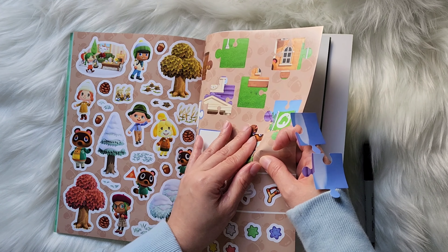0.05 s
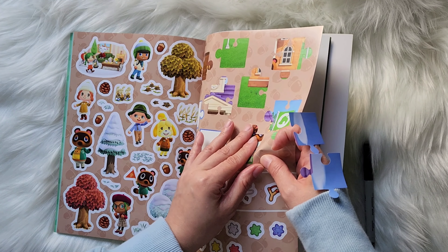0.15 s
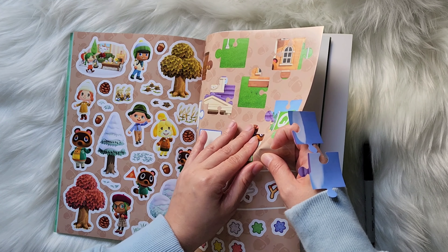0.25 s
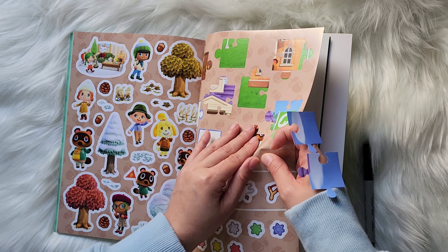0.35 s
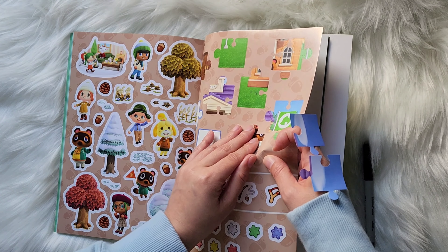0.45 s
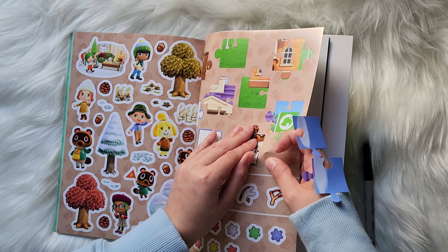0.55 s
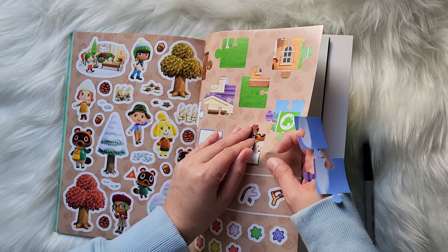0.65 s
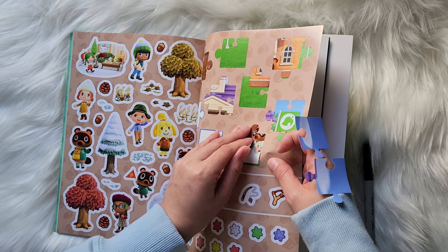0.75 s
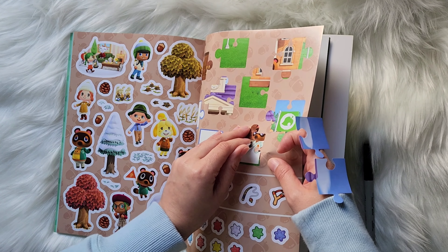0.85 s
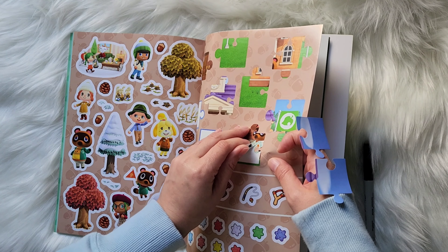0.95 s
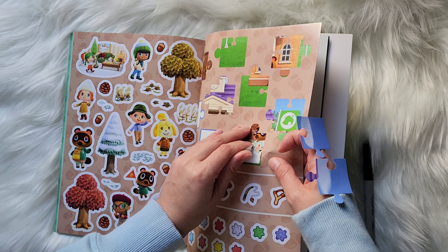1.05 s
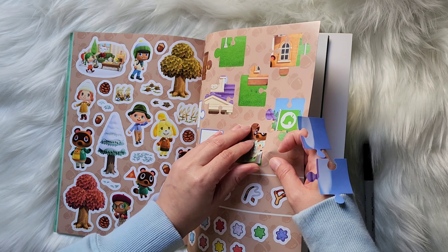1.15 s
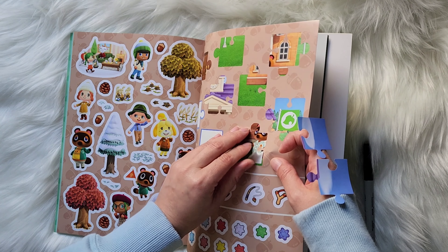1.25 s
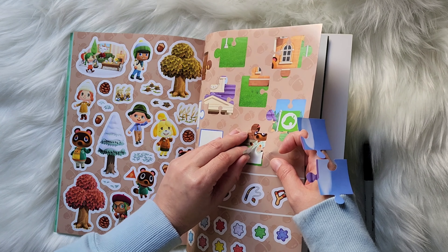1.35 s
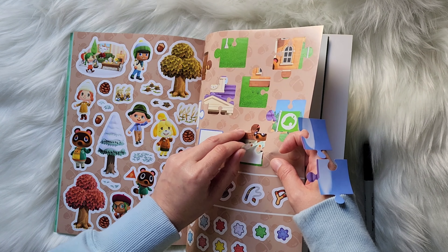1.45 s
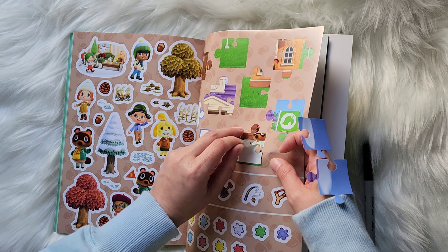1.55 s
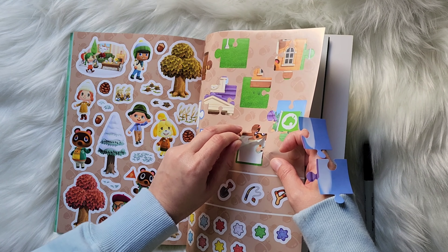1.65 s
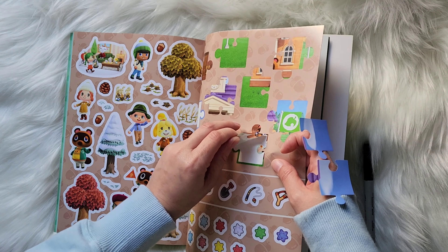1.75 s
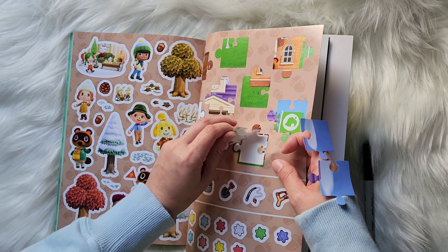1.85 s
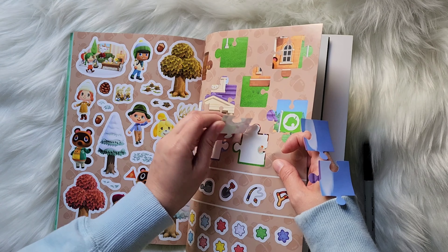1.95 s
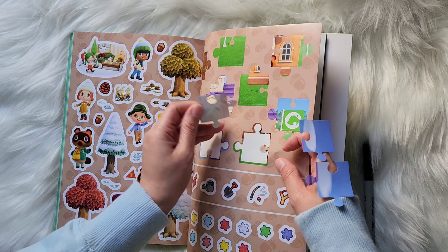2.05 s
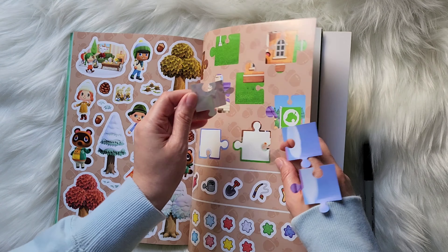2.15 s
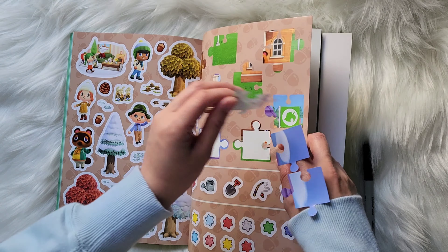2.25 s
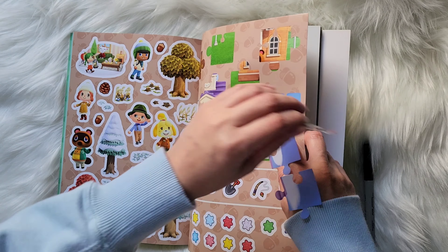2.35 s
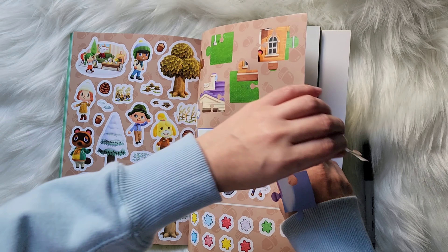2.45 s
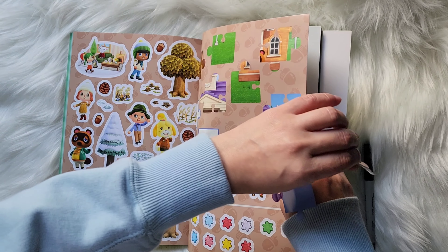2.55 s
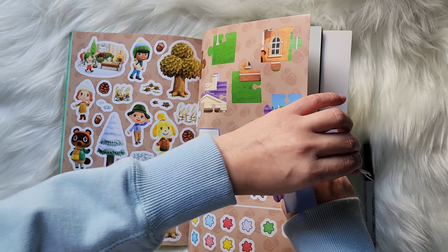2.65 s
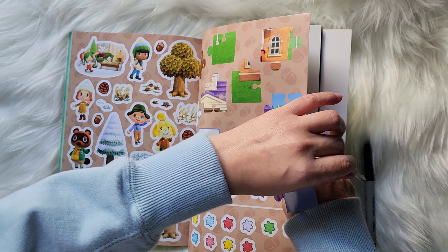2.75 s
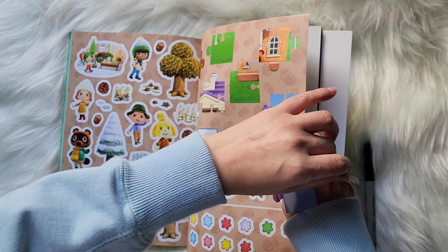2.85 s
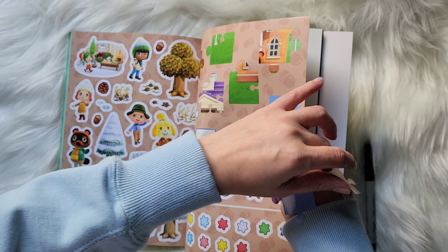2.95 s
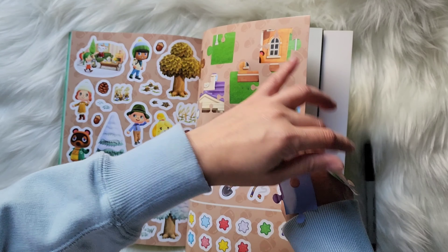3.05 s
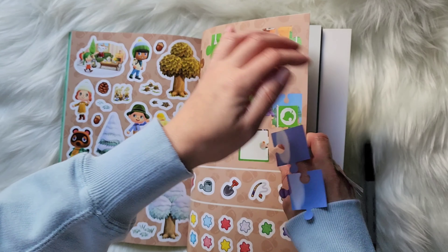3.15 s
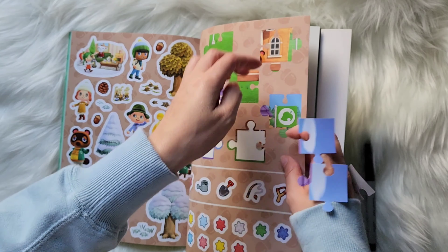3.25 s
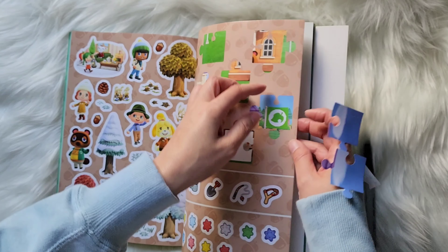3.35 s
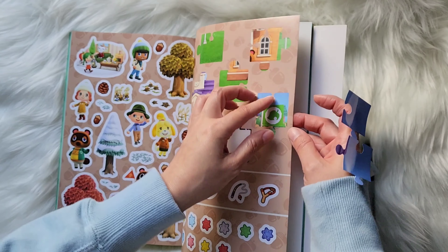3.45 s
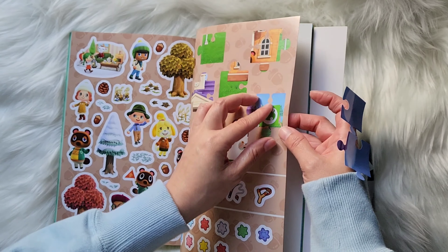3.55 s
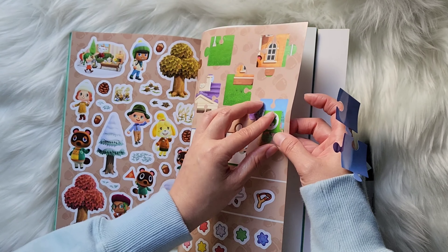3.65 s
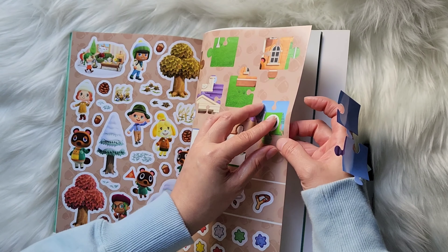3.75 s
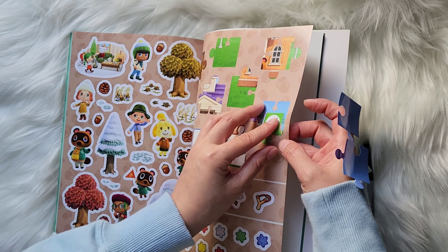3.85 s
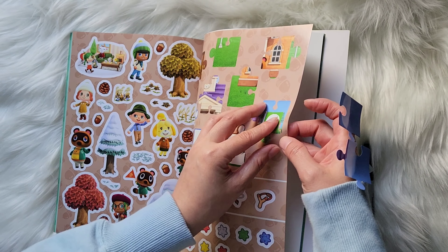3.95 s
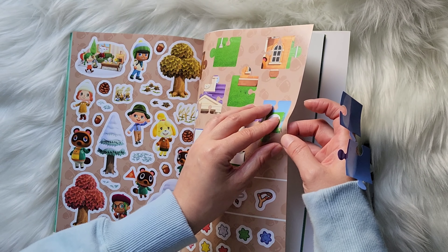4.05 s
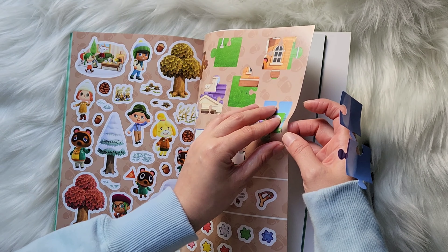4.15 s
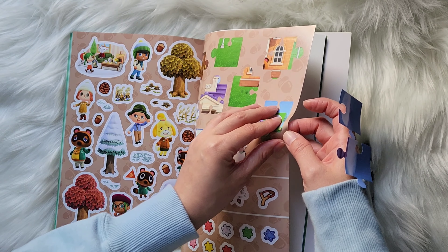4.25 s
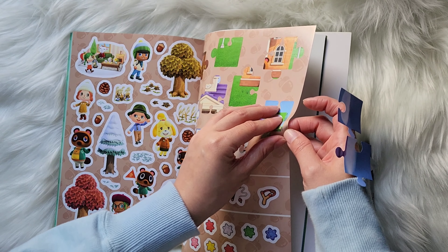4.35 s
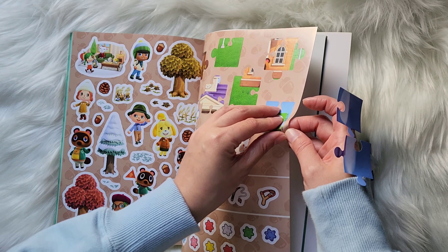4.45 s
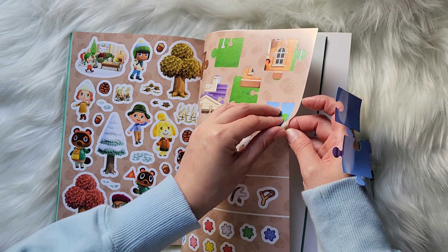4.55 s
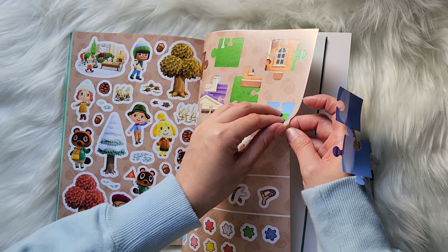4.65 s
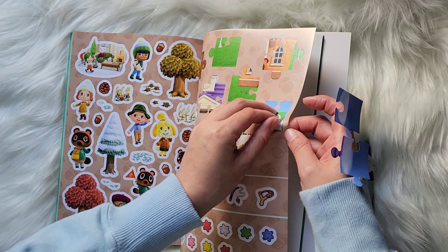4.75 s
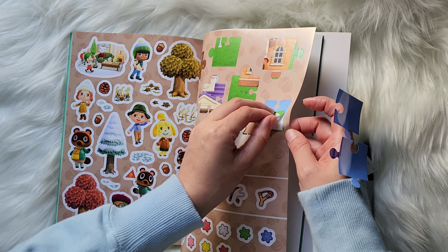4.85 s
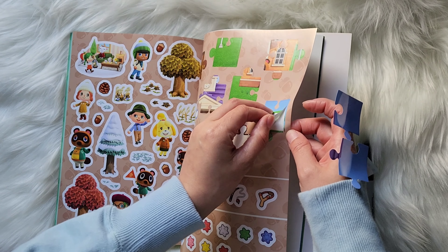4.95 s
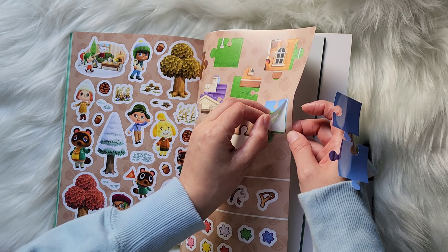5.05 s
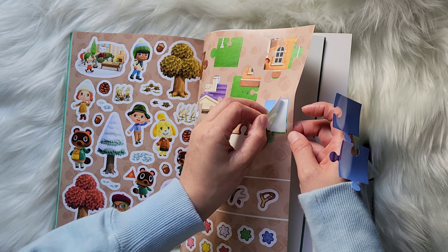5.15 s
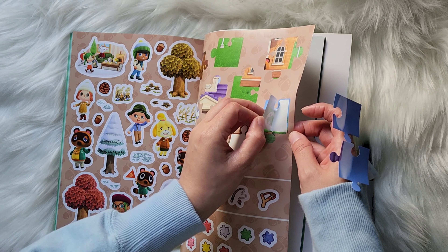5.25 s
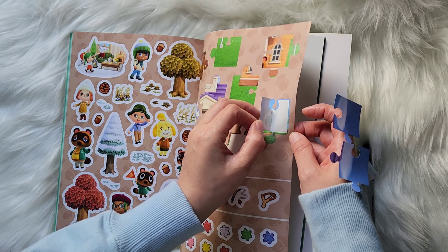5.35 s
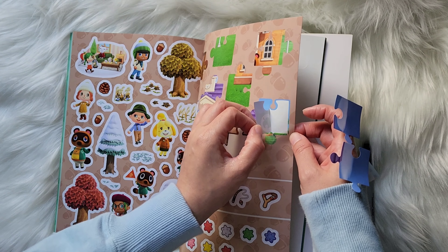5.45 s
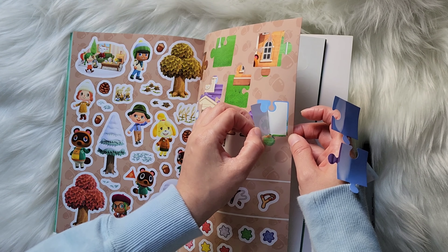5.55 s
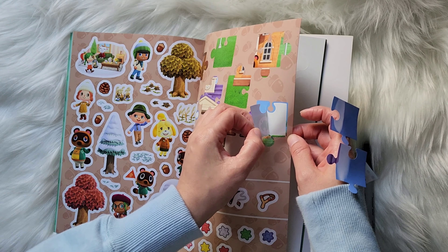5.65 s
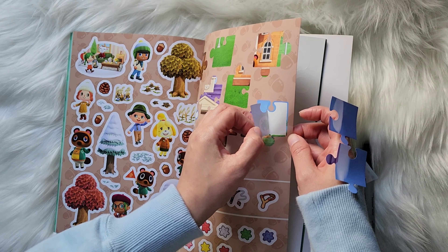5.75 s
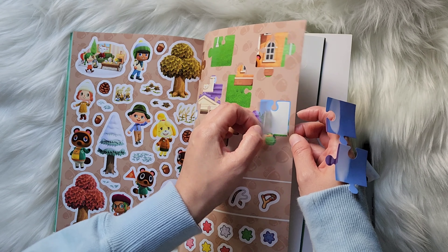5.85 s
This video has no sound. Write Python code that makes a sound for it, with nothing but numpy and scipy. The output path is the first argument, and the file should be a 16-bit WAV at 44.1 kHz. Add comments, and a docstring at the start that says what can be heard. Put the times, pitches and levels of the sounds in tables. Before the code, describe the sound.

Stickers are picked and peeled from a stiff paper page, with nail ticks, sharp snaps, soft rasping slides and fine crackle in a quiet room.

```python
"""Sharp snaps, nail ticks, papery slides and a fine crackle, close to a stereo microphone in a quiet room.
Stickers are picked loose and peeled off the stiff page of a sticker book, which snaps back as corners come free.
Each tick is a jolt with a burst of fibre slips; slides, peeling and bending are trains of tiny slips.
All of them pass through the resonances of the page and a small room; a low room tone lies underneath."""
import sys
import numpy as np
from scipy import signal
from scipy.fft import rfft, irfft
from scipy.io import wavfile
from scipy.ndimage import uniform_filter1d

SR = 44100
rng = np.random.default_rng(int(sys.argv[2]) if len(sys.argv) > 2 else 0)


def master_out(mix):
    """Clip the mix to full scale and print it as 16-bit PCM to the path in sys.argv[1]."""
    frames = np.transpose(np.atleast_2d(mix))
    ceiling = np.clip(frames, -1, 1)
    pcm = np.round(ceiling * 32767).astype(np.int16)
    wavfile.write(sys.argv[1], SR, pcm)


N = 260190
TIME = np.arange(N) / SR
TRACK_HZ = np.fft.rfftfreq(N, 1 / SR)
SIZE, LEAD = 4096, 128  # samples: length of a tick, and the part of it kept ahead of its onset
HZ = np.fft.rfftfreq(SIZE, 1 / SR)

# likeness of paper sounds between left and right: f/Hz, likeness/0-1
PAPER_LIKENESS = [(400, 0.85), (1400, 0.86), (2500, 0.3), (5000, 0.03), (12000, .25)]


def page_snaps():
    """The page buckles and snaps back, each time with its own colour."""
    # part levels are rms over 10 ms, before the dead spot; the ring width is that of one hump before squaring:
    # t/s, thud level/dB, thud f/Hz, ring level/dB, ring f/Hz, ring width/Hz,
    # crack level/dB, crack f/Hz, fizz level/dB, dead spot f/Hz
    snaps = [(1.117, -50.5, 200, -51, 1400, 800, -59, 2400, -62.5, 293),
             (1.6764, -39.5, 467, -31.5, 1415, 348, -46, 4400, -51, 690),
             (1.7398, -46, 600, -44.5, 1560, 850, -42.5, 4900, -47.5, 2950),
             (1.9085, -38.5, 620, -33.5, 1620, 1250, -28.5, 3000, -33, 210),
             (1.9136, -54, 579, -51, 1574, 1400, -40.5, 2604, -48, 210),
             (2.0382, -34.5, 480, -28, 1484, 650, -27, 3100, -35, 760),
             (2.227, -38, 430, -26, 1390, 520, -28, 2680, -50.5, 726),
             (3.3611, -56.5, 480, -40.5, 1440, 440, -40.5, 2120, -80, 251),
             (5.2785, -48.5, 524, -47.5, 880, 520, -52.5, 2735, -62, 740),
             (5.2831, -51, 524, -55, 850, 800, -61, 2400, -74, 740),
             (5.5826, -47.5, 396, -38.5, 1550, 895, -46.5, 2100, -70, 380),
             (5.757, -42, 403, -33.5, 1380, 950, -43, 2340, -92, 870)]
    return place([(s, tick(*colour, burst_s=.0024, travel_s=.0007)) for s, *colour in snaps])


def nail_ticks(fizz_below_crack_db=-18):
    """A nail catches the edge of a sticker: ticks of one pitch set, in varied strength."""
    # part levels as in the snaps: t/s, ring level/dB, thud level/dB, crack level/dB
    nails = [(0.0306, -44, -56, -47), (0.046, -57, -69, -64), (0.0535, -57, -67, -68),
             (0.064, -55, -70, -69), (0.077, -57, -70, -67), (0.088, -43.5, -68, -46.5),
             (0.1383, -67, -68.5, -57.5), (0.1868, -53, -56.5, -51.5), (0.2121, -46.5, -68, -49),
             (0.2394, -44, -54, -46.5), (0.269, -46.5, -58.5, -50), (0.3206, -59.5, -80, -57.5),
             (0.378, -52, -71, -52.5), (0.3894, -51, -67, -55), (0.402, -54, -71, -51.5),
             (0.4113, -53, -66, -55), (0.4202, -51, -69, -51), (0.5728, -50.5, -80, -51.5),
             (1.2285, -51.5, -58, -59), (2.324, -57.5, -60, -54), (2.634, -70.5, -80.5, -71.5),
             (3.411, -44.5, -61, -56), (3.4244, -52, -60.5, -54.5), (3.9757, -55.5, -62, -80),
             (4.256, -58.5, -65, -75), (4.2952, -57.5, -79, -72), (4.323, -58, -77, -75),
             (4.3511, -52.5, -80, -64.5), (4.3888, -47.5, -67.5, -54.5), (4.5362, -47.5, -78, -51),
             (4.6549, -51.5, -82, -55), (5.0568, -53.5, -57, -56), (5.1571, -52.5, -63, -61),
             (5.3927, -54.5, -59, -59.5), (5.891, -54.5, -55, -59.5)]
    sounds = []
    for s, ring_db, thud_db, crack_db in nails:
        sound = tick(thud_db, 384, ring_db, 1240, 960, crack_db, 2410, crack_db + fizz_below_crack_db, dead_hz=520)
        sounds.append((s, sound))
    return place(sounds)


def glue_pops(thud_below_ring_db=-9):
    """A spot of glue gives way at once, with a bright pop that tugs the page."""
    # part levels as in the snaps: t/s, fizz level/dB, crack level/dB, ring level/dB
    pops = [(0.9593, -57, -63, -65), (0.9977, -59, -65, -79), (1.4477, -66, -64, -61.5),
            (1.5267, -66, -60, -64), (1.5416, -65, -64, -62), (1.7786, -47, -45, -50),
            (1.8, -55, -57, -52.5), (1.8798, -60, -54.5, -53), (1.9877, -45, -46, -52.5),
            (2.964, -74, -56.5, -63.5), (4.7682, -55.5, -56.5, -61.5), (4.8057, -60, -59, -61),
            (5.0716, -56, -53.5, -51), (5.2292, -56, -58.5, -65), (5.2535, -54.5, -55.5, -71),
            (5.346, -62, -60.5, -62)]
    sounds = []
    for s, fizz_db, crack_db, ring_db in pops:
        thud_db = ring_db + thud_below_ring_db
        sound = tick(thud_db, 450, ring_db, 1520, 630, crack_db, 4700, fizz_db, dead_hz=780, burst_s=.0021)
        sounds.append((s, sound))
    return place(sounds)


def sliding(rasp_trim_db=-1, hiss_trim_db=-2, broad_db=-7, resting_rasp_db=-77, resting_hiss_db=-79):
    """Fingers and sleeve rasp and hiss on the page; the pitch of the rasp moves with the grip."""
    # strokes over the page, levels before trim: peak t/s, rise/s, fall/s, rasp level/dB, hiss level/dB, rasp f/Hz
    strokes = [(0.02, 0.14, 0.2, -59.5, -65.5, 1470), (0.41, .08, 0.24, -55.5, -60, 1656),
               (0.55, 0.077, .05, -67, -62, 1650), (0.88, 0.034, .03, -67, -68.5, 1623),
               (0.97, 0.084, 0.1, -66.5, -73, 1500), (1.18, .018, .02, -64, -74, 1500),
               (1.27, .04, 0.053, -63, -75, 1700), (1.319, 0.025, 0.016, -52.5, -51.5, 1453),
               (1.52, 0.082, 0.06, -69.5, -64.5, 1500), (1.68, 0.019, .2, -65.5, -61, 1500),
               (1.82, .08, 0.13, -62, -66, 1570), (1.97, 0.054, .018, -57.5, -54.5, 1480),
               (2.18, 0.13, .11, -57.5, -69, 1750), (2.315, .06, .025, -57, -65.5, 1560),
               (2.44, .02, .04, -68.5, -67, 1600), (2.94, 0.072, 0.084, -63.5, -69.5, 1800),
               (3.145, 0.035, 0.08, -62, -68, 1900), (3.26, .08, 0.097, -56.5, -63, 2000),
               (3.47, 0.1, 0.047, -57.5, -63, 1296), (3.61, 0.09, 0.14, -55, -61.5, 1250),
               (3.84, 0.088, 0.043, -55.5, -58.5, 1550), (4.03, 0.14, 0.15, -59, -71.5, 1420),
               (4.25, .05, 0.028, -61, -79, 1400), (4.43, .13, 0.086, -60.5, -71, 1400),
               (4.55, .015, 0.057, -55.5, -65, 1420), (4.77, 0.12, 0.058, -57, -58, 1450),
               (4.95, .07, 0.1, -66.5, -69, 1445), (5.105, 0.049, 0.072, -56, -54, 1610),
               (5.28, 0.053, 0.061, -63.5, -62.5, 1590), (5.41, 0.035, 0.044, -59.5, -72, 1480),
               (5.47, .03, 0.016, -65, -63.5, 1486), (5.64, 0.044, .09, -62, -81, 1520),
               (5.89, .07, .1, -65, -83, 1650)]
    # colour of the rasp: f/Hz, level/dB
    rasp_colour = [(200, -32.5), (600, -17.5), (850, -9.5), (1150, -1.5), (1600, -1.5), (2200, -1),
                   (2700, -6.5), (3100, -11.5), (4500, -25.5), (16000, -54.5)]
    # colour of the hiss: f/Hz, level/dB
    hiss_colour = [(1000, -32.5), (2300, -7), (3200, -0.5), (5000, -3), (8200, -3), (9200, -19),
                   (16000, -35)]
    *timing, rasps_db, hisses_db, hz = np.transpose(strokes)
    rasping = swells(*timing, rasps_db)
    hissing = swells(*timing, hisses_db)

    rasp = friction(rasp_colour, slips_per_s=320, spread_db=1.5, smooth_db=-1, clump_db=2, clump_hz=53)
    pitched = resonate(rasp, grip(rasping, hz), width_hz=410)
    rasp = unit(pitched + amp(broad_db) * rasp)
    hiss = friction(hiss_colour, slips_per_s=1500, spread_db=4.5, smooth_db=-4, clump_db=2, clump_hz=69)
    hiss = patchy(hiss, depth_db=2)

    # the hands never lie quite still, so each gain rests on a floor
    rasp_gain = amp(rasp_trim_db) * np.hypot(level(rasping), amp(resting_rasp_db))
    hiss_gain = amp(hiss_trim_db) * np.hypot(level(hissing), amp(resting_hiss_db))
    return rasp * rasp_gain + hiss * hiss_gain


def peeling(trim_db=-2, resting_db=-91.5):
    """Threads of glue break one after another along the edge of the sticker."""
    # stretches pulled off the page, levels before trim: peak t/s, rise/s, fall/s, crackle level/dB
    pulls = [(0.02, .1, .3, -79), (0.42, .12, .1, -85), (0.545, 0.057, 0.043, -55.5),
             (0.7, 0.11, 0.067, -68), (0.95, 0.099, .07, -75.5), (1.319, 0.018, 0.013, -48.5),
             (1.49, .05, 0.074, -74), (1.76, 0.067, .08, -59), (1.92, .02, .11, -56.5),
             (2.22, 0.034, .06, -66.5), (2.49, 0.078, 0.084, -82), (2.96, 0.017, .04, -78),
             (3.43, 0.15, 0.1, -76), (3.64, .05, .12, -77), (3.84, .07, .04, -69),
             (4.755, .042, 0.052, -56.5), (4.97, 0.11, .08, -66.5), (5.11, 0.074, 0.063, -51),
             (5.255, 0.028, 0.1, -64)]
    # colour of the breaking glue: f/Hz, level/dB
    glue_colour = [(1000, -32.5), (3000, -4.5), (5000, -4.5), (8000, 0), (11000, 0), (14000, 1.5),
                   (16000, -8)]
    crackle = friction(glue_colour, slips_per_s=1100, spread_db=5.5, smooth_db=-12, clump_db=4, clump_hz=170)
    pull = level(swells(*np.transpose(pulls)))
    return amp(trim_db) * patchy(crackle, depth_db=2.5) * np.hypot(pull, amp(resting_db))


def bending(trim_db=-1, resting_db=-78.5):
    """The page murmurs low as it is dragged and bent under the hand."""
    # bends of the page, levels before trim: peak t/s, rise/s, fall/s, level/dB, f/Hz
    bends = [(0.14, .3, 0.33, -62.5, 338), (0.6, .3, 0.37, -75, 420), (1.04, .04, .02, -70.5, 444),
             (1.13, .02, 0.089, -68.5, 445), (1.319, 0.017, 0.012, -54.5, 450),
             (1.48, 0.035, 0.018, -69, 435), (1.76, .08, .05, -63, 480), (2.048, .006, 0.014, -43, 439),
             (2.21, .11, .095, -57, 440), (3.25, 0.059, 0.095, -63.5, 570), (3.44, .06, .07, -69, 424),
             (3.8, .15, 0.21, -62.5, 335), (4.05, 0.19, .3, -63, 307), (4.83, 0.23, .3, -66.5, 365),
             (5.09, .035, .05, -59.5, 440), (5.285, .012, .02, -59.5, 480), (5.4, .03, .06, -68, 390),
             (5.6, .03, .06, -73, 350), (5.78, .03, 0.037, -66, 340), (5.89, 0.014, .06, -60.5, 500)]
    # colour of the murmur: f/Hz, level/dB
    bend_colour = [(80, -18), (200, -5.5), (310, 3.5), (420, -6.5), (600, -2.5), (800, -10), (1500, -33),
                   (5000, -61)]
    *timing, db, hz = np.transpose(bends)
    effort = swells(*timing, db)
    murmur = friction(bend_colour, slips_per_s=400, spread_db=4, smooth_db=-0.5, clump_db=1, clump_hz=22)
    murmur = resonate(murmur, grip(effort, hz), width_hz=130)
    return amp(trim_db) * murmur * np.hypot(level(effort), amp(resting_db))


def tick(thud_db, thud_hz, ring_db, ring_hz, ring_width_hz, crack_db, crack_hz, fizz_db, dead_hz,
         dead_db=-8, dead_width=0.13, thud_width_hz=330, crack_width=1.37, rise_s=0.00044, burst_s=0.0034,
         rough_hz=2600, flutter_s=0.0082, flutter_db=-19, travel_s=0.000608):
    """A jolt of the page with a brief burst of fibre slips that roughens its treble."""
    # colour of the thud: f/Hz, level/dB
    thud_colour = [(50, -13), (160, 0.5), (250, 0), (400, 5.5), (600, 1.5), (900, -6.5), (1600, -34),
                   (4000, -62)]
    # colour of the ring: f/Hz, level/dB
    ring_colour = [(200, -30.5), (650, -11), (1000, -4), (1500, 3), (2000, 3.5), (3000, -1), (8000, -29.5)]
    # colour of the crack: f/Hz, level/dB
    crack_colour = [(600, -38), (1500, -10), (2200, 2.5), (2800, -1.5), (4500, 0), (8000, 3.5),
                    (10000, -21.5), (16000, -38.5)]
    # colour of the fizz: f/Hz, level/dB
    fizz_colour = [(1000, -43.5), (3500, -10.5), (6000, 4.5), (9000, -0.5), (12000, -1.5), (16000, -7.5)]
    t = (np.arange(SIZE) - LEAD) / SR
    decay = np.exp(-np.maximum(t, 0) / burst_s)
    flutter = amp(flutter_db) * np.exp(-abs(t) / flutter_s)
    burst = np.exp(np.minimum(t, 0) / rise_s) * (decay + flutter)
    slips = rng.standard_normal((3, SIZE)) * burst
    slips = rfft(slips / np.linalg.norm(slips, axis=1, keepdims=True))
    slips = pair(slips[0], slips[1:], read(PAPER_LIKENESS, HZ))

    jolt = np.exp(-2j * np.pi * HZ * LEAD / SR)
    rough = HZ ** 4 / (HZ ** 4 + rough_hz ** 4)
    drive = pair(jolt, slips, 1 - rough)
    # bending waves cross the sheet faster at high pitch; travel_s is the delay at 1 kHz
    travel = np.exp(-4j * np.pi * travel_s * np.sqrt(1000 * HZ))

    # the place of the blow picks which resonances speak, and leaves one pitch dead
    parts = [(thud_db, paper(thud_colour) * hump(thud_hz, thud_width_hz)),
             (ring_db, paper(ring_colour) * hump(ring_hz, ring_width_hz) ** 2),
             (crack_db, paper(crack_colour) * hump(crack_hz, crack_width * crack_hz) ** 2),
             (fizz_db, paper(fizz_colour))]
    power = sum((amp(db) * unit(part)) ** 2 for db, part in parts)
    power *= amp(dead_db * hump(dead_hz, dead_width * dead_hz) ** 2) ** 2

    fade = np.minimum(1, np.linspace(2, 0, SIZE)) ** 4
    sound = irfft(drive * travel * causal(np.sqrt(power))) * fade
    # levels count as rms over 10 ms
    return unit(sound) * np.sqrt(power.mean() * .01 * SR / SIZE)


def place(sounds):
    """Lays stereo ticks on the track, each onset at its time in seconds."""
    mix = np.zeros((2, N + LEAD))
    for s, sound in sounds:
        part = mix[:, round(s * SR):][:, :sound.shape[1]]
        part += sound[:, :part.shape[1]]
    return mix[:, LEAD:]


def friction(colour, slips_per_s, spread_db, smooth_db, clump_db, clump_hz):
    """Tiny slips of uneven size over a smooth rush, gathered in clumps; all pass through the page."""
    size = amp(spread_db * np.minimum(rng.exponential(1, (3, N)), 4))
    sign = rng.choice([-1, 1], (3, N))
    slips = size * sign * (rng.random((3, N)) < slips_per_s / SR)
    rush = amp(smooth_db) * rng.standard_normal((3, N))
    z = rfft((unit(slips) + rush) * amp(clump_db * wander(clump_hz)))
    both = irfft(pair(z[0], z[1:], read(PAPER_LIKENESS, TRACK_HZ)), N)
    response = irfft(causal(paper(colour)))
    return unit(signal.oaconvolve(both, response[None], axes=1)[:, :N])


def paper(colour):
    """Gain of a contact of this colour, heard through the resonances of the page."""
    # resonances of the page and book: f/Hz, width/Hz, level/dB
    modes = [(187.4, 32, 7), (243, 45, 2.5), (372.2, 54, 5), (460, 32, 3), (588.8, 60, 7), (790, 340, 2.5),
             (1112, 78, 5), (1390, 240, 3), (1890, 55, 3.5), (2073, 150, 5), (2225, 110, 4), (2432, 130, 7),
             (2690, 160, 4), (2950, 180, 3), (3502, 67, -1), (3950, 250, 2.5), (4386, 580, 4.5),
             (5300, 900, -2), (6350, 480, 1), (6940, 240, -5), (7340, 87, 1), (7630, 160, 4)]
    peaks_db = sum(db / (1 + (2 * (HZ - hz) / width) ** 2) for hz, width, db in modes)
    return amp(read(colour, HZ) + peaks_db)


def hump(hz, width_hz):
    """Gain of one resonance; squared, its skirts are steeper and its start softer."""
    return 1 / np.hypot(1, 2 * (HZ - hz) / width_hz)


def causal(gain):
    """Spectrum of the response with this gain's shape that starts at once and then dies away."""
    log_gain = np.log(np.maximum(gain / gain.max(), 1e-5))
    circle = np.concatenate([log_gain, log_gain[-2:0:-1]])
    return np.exp(np.conj(signal.hilbert(circle)))[:len(gain)]


def resonate(x, hz, width_hz):
    """A resonance that follows the curve hz: shift down to zero, smooth, shift back."""
    turn = np.exp(2j * np.pi * np.cumsum(hz) / SR)
    r = np.exp(-np.pi * width_hz / SR)
    return unit((turn * signal.lfilter([1 - r], [1, -r], x / turn)).real)


def patchy(x, depth_db):
    """The colour drifts band by band as the contact travels over the sheet."""
    z = signal.stft(x, nperseg=256)[2]
    drift = rng.standard_normal(z.shape[1:])
    drift = uniform_filter1d(drift, size=4, axis=0)  # across neighbouring pitches
    drift = uniform_filter1d(drift, size=18, axis=1)  # over time
    return unit(signal.istft(z * amp(depth_db * unit(drift)), nperseg=256)[1][:, :N])


def swells(peak_s, rise_s, fall_s, db, edge_db=-9, shape=1.64):
    """Power over time of each movement, one row apiece: down edge_db one rise before and one fall after its peak."""
    t = TIME[::32] - peak_s[:, None]
    away = np.maximum(-t / rise_s[:, None], t / fall_s[:, None])
    return amp(db[:, None] + edge_db * away ** shape) ** 2 + 1e-30


def level(power):
    """Gain over time of all movements together."""
    return np.interp(TIME, np.linspace(0, TIME[-1], power.shape[1]), np.sqrt(power.sum(0)))


def grip(power, hz):
    """Pitch of the paper left free between the fingers: the strongest movement weighs most."""
    return (level(power * hz[:, None]) / level(power)) ** 2


def wander(corner_hz):
    """Slow random drift of rms 1, with little motion above the corner."""
    return unit(irfft(rfft(rng.standard_normal(N)) / (1 + (TRACK_HZ / corner_hz) ** 4), N))


def pair(shared, own, likeness):
    """Left and right spectra: a shared part and a part of their own."""
    return np.sqrt(likeness) * shared + np.sqrt(1 - likeness) * own


def read(points, hz):
    """Reads a spectrum table on a log-frequency axis."""
    f, value = np.transpose(points)
    return np.interp(np.log(hz + 1), np.log(f + 1), value)


def amp(db):
    """Decibels to gain."""
    return 10 ** (np.asarray(db) / 20)


def unit(x):
    """Scales to rms 1."""
    return x / np.sqrt(np.mean(x ** 2) + 1e-30)


def room(x, first_s=0.0036, bounce_s=.0053, bounce_db=-17, early_db=5, early_s=0.018, alike_hz=900):
    """A near surface bounces the sound once; the small room dies away, its bass alike on both sides."""
    # decay of the late echo: f/Hz, time to fall 60 dB/s
    decay_s = [(200, 0.25), (500, 0.46), (1500, 0.17), (5000, 0.3), (14000, 0.17)]
    # colour of the echo: f/Hz, level/dB
    echo_colour = [(200, -10.5), (500, -10), (1400, -10.5), (3000, -10), (7000, -7), (14000, -8)]
    t = np.arange(SR // 2) / SR
    early = 1 + amp(early_db) * np.exp(-t / early_s)
    taps = rng.standard_normal((3, len(t))) * (t > first_s) * early
    hz, frame_s, z = signal.stft(taps, SR, nperseg=256)
    z = pair(z[0], z[1:], 1 / (1 + (hz[:, None] / alike_hz) ** 2))
    z *= amp(-60 * frame_s / read(decay_s, hz)[:, None])
    # even out the energy per band, so the colour alone sets the spectrum
    energy = (abs(z) ** 2).sum(2).mean(0)
    z /= np.sqrt(uniform_filter1d(energy, size=3))[:, None]
    plain = signal.istft(z, SR, nperseg=256)[1]
    tail = signal.istft(z * amp(read(echo_colour, hz))[:, None], SR, nperseg=256)[1]
    tail /= np.linalg.norm(plain[0])
    tail[:, round(bounce_s * SR)] += amp(bounce_db)
    return x + signal.fftconvolve(x, tail, axes=1)[:, :N]


def room_tone(level_db=-59.5):
    """Low rumble of the building under a faint hiss: coloured noise, partly shared by both sides."""
    # colour of the still room, relative: f/Hz, level/dB
    tone_colour = [(15, -20), (30, -12), (48, -1), (62, 0.07), (88, -2), (115, -12), (160, -20), (260, -29),
                   (500, -36), (1000, -43), (3000, -48), (8200, -51), (9200, -58), (16000, -58)]
    # likeness between left and right: f/Hz, likeness/0-1
    tone_likeness = [(50, 1), (300, 0.65), (1000, 0.72), (4000, 0.28)]
    z = rfft(rng.standard_normal((3, N)))
    both = pair(z[0], z[1:], read(tone_likeness, TRACK_HZ))
    return amp(level_db) * unit(irfft(both * amp(read(tone_colour, TRACK_HZ)), N))


def scene(left_lead=6):
    """The book lies slightly to the left: its sound reaches the left side left_lead samples early."""
    # left minus right: f/Hz, level/dB
    balance = [(200, -2.5), (600, 1.5), (1400, 3), (3000, -2.5), (6000, 1), (9000, 3), (13000, 3.5)]
    ticks = page_snaps() + nail_ticks() + glue_pops()
    near = room(ticks + sliding() + peeling() + bending())
    side_db = read(balance, TRACK_HZ) / 2
    left, right = irfft(rfft(near) * amp([side_db, -side_db]), N)
    right = np.pad(right, (left_lead, 0))[:N]
    return np.array([left, right]) + room_tone()


def record(dry):
    """The recorder's band limit: a steep low-pass."""
    low_pass = signal.firwin(301, 16300, window=("kaiser", 9), fs=SR)  # cutoff in Hz
    return signal.oaconvolve(dry, low_pass[None], "same")


dry = scene()
out = record(dry)
master_out(out)
```